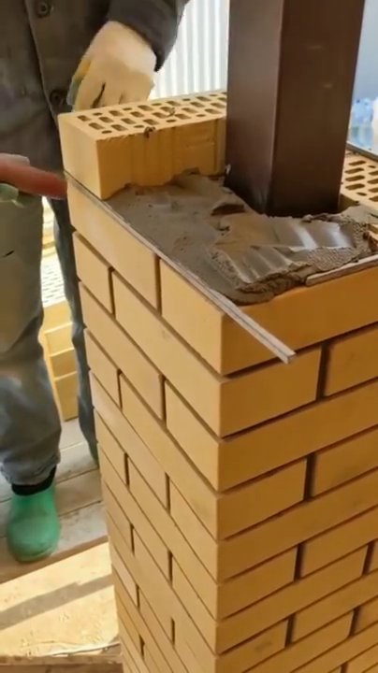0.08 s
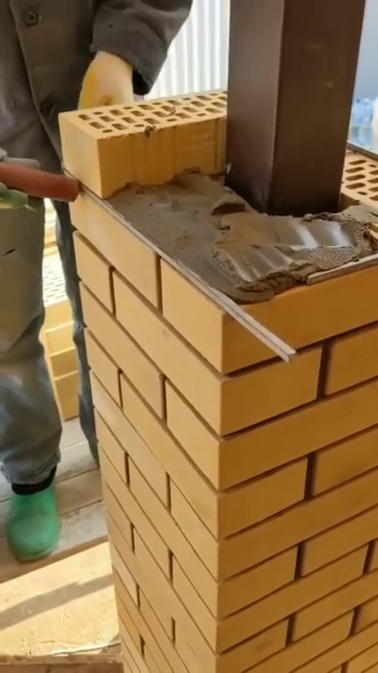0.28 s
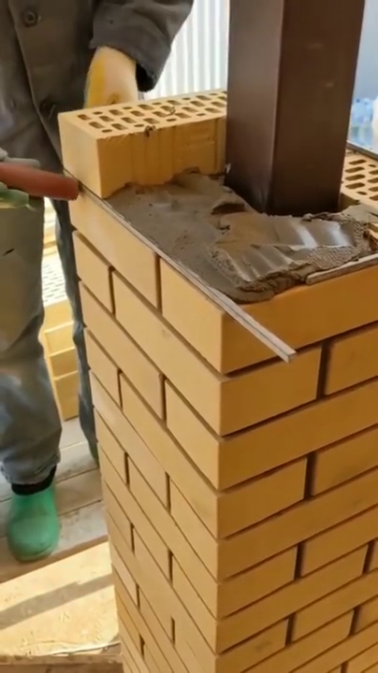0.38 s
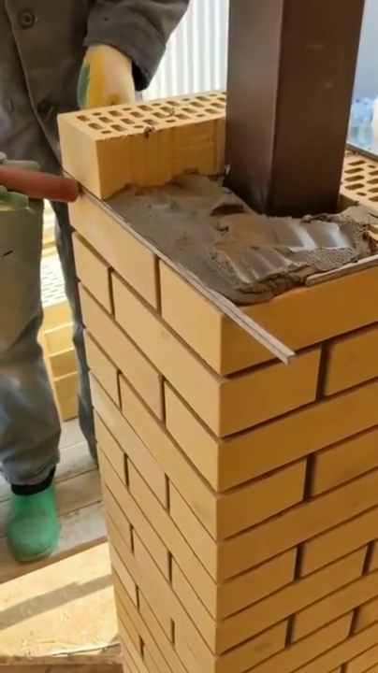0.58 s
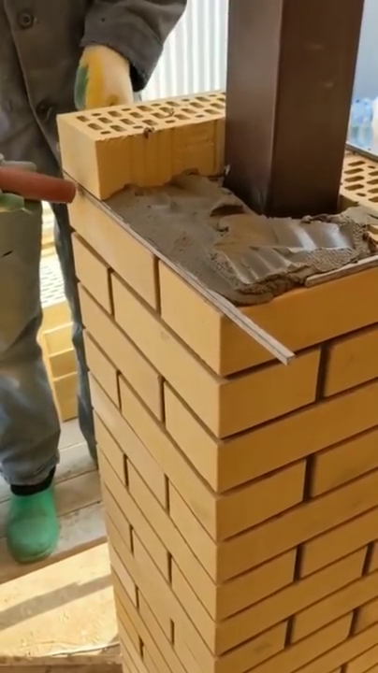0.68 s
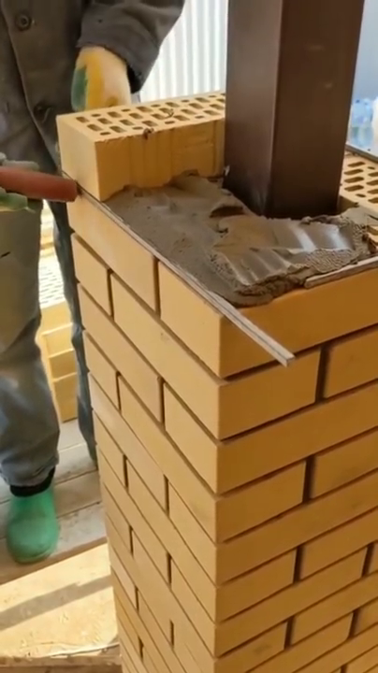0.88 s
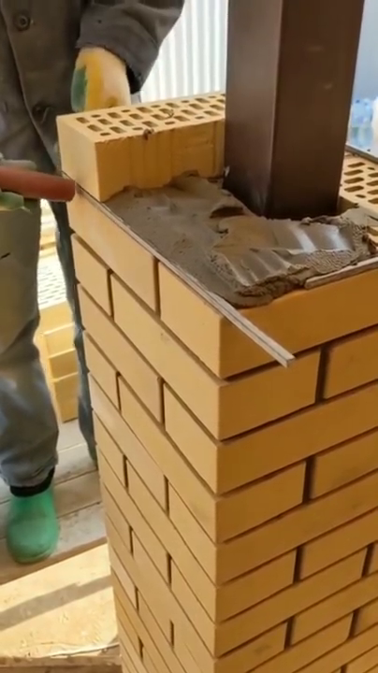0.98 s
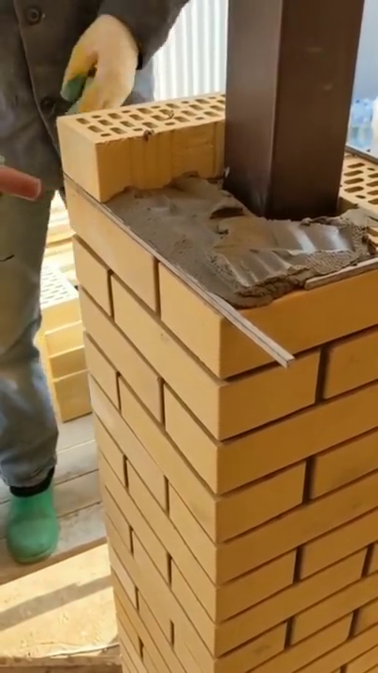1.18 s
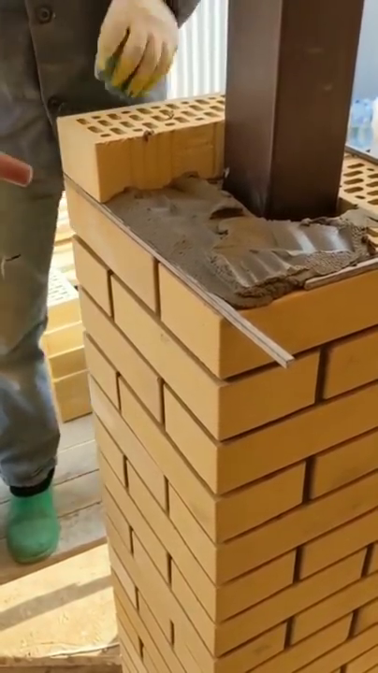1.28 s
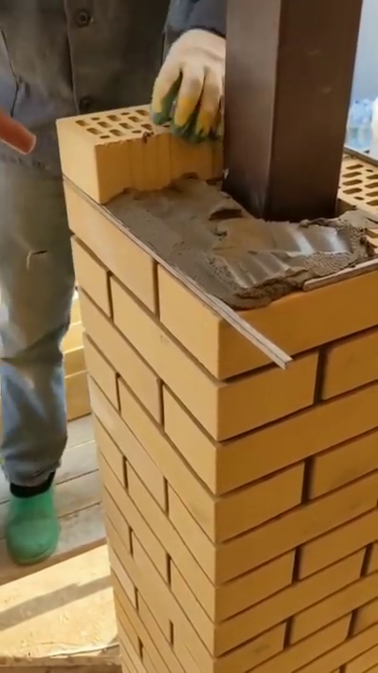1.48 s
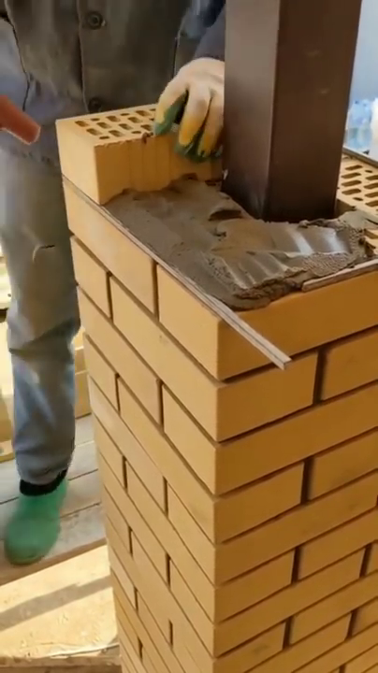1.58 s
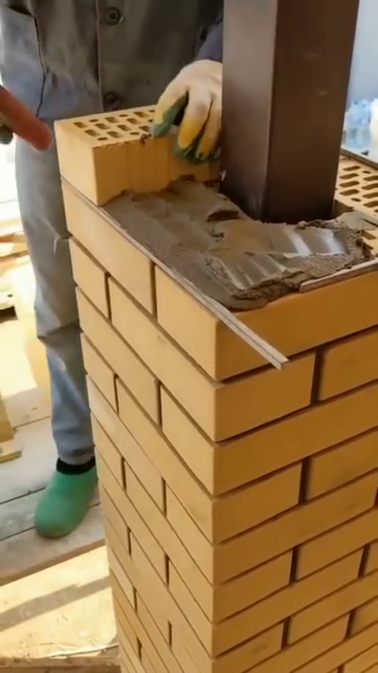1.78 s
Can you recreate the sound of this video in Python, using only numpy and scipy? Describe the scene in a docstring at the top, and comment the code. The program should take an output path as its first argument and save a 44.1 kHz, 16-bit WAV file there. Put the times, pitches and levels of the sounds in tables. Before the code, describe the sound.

A steel trowel taps a hollow clay brick five times, growing harder with a slight metallic ring, then touches lightly and scrapes gritty mortar; dull board knocks underfoot, close microphone, short room-like tail, quiet low rumble.

```python
"""Building site: a steel trowel taps a hollow clay brick down into its mortar bed.
Five blows, harder up to the fourth, then two light touches: coloured noise clacks plus dying modes of brick,
blade and clank, all with a room tail. Dull knocks from the boards underfoot: decaying sines with rattle noise.
The blade then scrapes mortar off the joint: random grain clicks through resonances, as rasp, drone and hiss.
Beneath lie a quiet noise rumble and faint rubs of glove and blade on the brick."""
import sys
import numpy as np
from scipy import signal
from scipy.fft import rfft, irfft
from scipy.io import wavfile

SR = 44100
rng = np.random.default_rng(int(sys.argv[2]) if len(sys.argv) > 2 else 0)


def digitize_waveform(pressure):
    """Quantize a signal to 16-bit integers and store it at the path in sys.argv[1].

    Rows of a 2-D input are taken as channels; values are limited to [-1, 1].
    """
    field = np.atleast_2d(pressure).T
    bounded = np.clip(field, -1, 1)
    quanta = np.round(bounded * 32767).astype(np.int16)
    wavfile.write(sys.argv[1], SR, quanta)


N = 81585
T = np.arange(N) / SR
FREQS = np.maximum(np.fft.rfftfreq(N, 1 / SR), 1)
RING_RISE_S, TAIL_RISE_S = 0.00083, 0.015


def from_db(db):
    """Decibels to amplitude gain."""
    return 10 ** (np.asarray(db) / 20)


def rms_one(x):
    """Scale to unit rms."""
    return x / np.sqrt(np.mean(x ** 2) + 1e-20)


def at_hz(points, hz):
    """Interpolate (f/Hz, value) rows on a log-frequency axis."""
    f, value = np.transpose(points)
    return np.interp(np.log(hz), np.log(f), value)


def levels(rows):
    """Gain curves from rows of (t/s, level/dB, ..), silent before the first row."""
    t_s, *columns_db = np.transpose(rows)
    started = T >= t_s[0]
    return [started * from_db(np.interp(T, t_s, db)) for db in columns_db]


def wander(per_s):
    """Random values at a given rate, joined by straight lines."""
    return np.interp(T * per_s, np.arange(2048), rng.standard_normal(2048))


def noise(spectrum, extra_db=0):
    """Noise of a given colour at about unit rms, then tinted by extra dB per frequency."""
    colour = rms_one(from_db(at_hz(spectrum, FREQS)))
    white = rfft(rng.standard_normal(N))
    return irfft(white * colour * from_db(extra_db), N)


def strike(start_s, rise_s, t60_s):
    """Impact envelope: linear rise times an exponential decay of 60 dB per t60."""
    age_s = np.maximum(T - start_s, 0)
    decay = np.exp(-np.log(1000) * age_s / t60_s)
    return np.minimum(age_s / rise_s, 1) * decay


def die_away(x, start_s, rise_s):
    """Absorption: overlapping octave bands of x each die at the room's rate."""
    # room decay: f/Hz, t60/s
    room_t60 = [(150, 0.4), (600, 0.31), (2000, 0.27), (5000, 0.19), (12000, 0.23)]
    centres_hz = 110 * 2. ** np.arange(8)
    spectrum = rfft(x)
    out = 0
    for hz, share in zip(centres_hz, np.eye(len(centres_hz))):
        weight = np.interp(np.log(FREQS), np.log(centres_hz), share)
        band = irfft(spectrum * weight, N)
        out = out + band * strike(start_s, rise_s, at_hz(room_t60, hz))
    return out


def room(x):
    """Diffuse reflections: convolution with a decaying noise response of unit energy."""
    response = die_away(rng.standard_normal(N), 0.0017, TAIL_RISE_S)
    return signal.fftconvolve(x, rms_one(response) / np.sqrt(N))[:N]


def ring(start_s, modes):
    """Struck modes: dying sines that waver as reflections overlap them."""
    waver_depth, waver_per_s = 0.27, 170
    out = 0
    for hz, db, t60_s in modes:
        waver = 1 + waver_depth * wander(waver_per_s)
        tone = np.sin(2 * np.pi * (hz * (T - start_s) + rng.random()))
        out = out + from_db(db) * strike(start_s, RING_RISE_S, t60_s) * waver * tone
    return out


def resonate(x, peaks):
    """Parallel two-pole resonances; rms 1."""
    out = 0
    for hz, width_hz, db in peaks:
        r = np.exp(-np.pi * width_hz / SR)  # pole radius
        zeros = [(1 - r * r) / 2, 0, (r * r - 1) / 2]
        poles = [1, -2 * r * np.cos(2 * np.pi * hz / SR), r * r]
        out = out + from_db(db) * signal.lfilter(zeros, poles, x)
    return rms_one(out)


def grit():
    """Sand grains snap under the juddering blade, and the room blurs them; rms 1."""
    grains_per_s, spread_db = 1400, 4.5
    judder_db, judder_per_s, room_db = 3.5, 110, 3.5
    sizes = from_db(spread_db * np.minimum(rng.exponential(1, N), 3))
    signed = sizes * rng.choice([-1, 1], N)
    snaps = rng.random(N) < grains_per_s / SR
    clicks = signed * snaps * from_db(judder_db * wander(judder_per_s))
    return rms_one(clicks + from_db(room_db) * room(clicks))


def background():
    """Site rumble as coloured noise; faint rubs as grit through ringing brick modes."""
    # site noise colour: f/Hz, density/dB per Hz (relative)
    site_colour = [(15, -36), (25, 0.5), (197, -3), (264, -2), (293, -10), (824, -14), (1160, -19),
                   (2570, -20), (3350, -26.5), (3730, -28), (14000, -41)]
    # rubs of glove and blade on the brick: t/s, level/dB
    stir_levels = [(0, -45), (.035, -55), (.075, -50.5), (.11, -82), (.22, -81), (1.25, -85), (1.287, -47),
                   (1.32, -55), (1.4, -69)]
    # rub resonances: f/Hz, width/Hz, level/dB (relative)
    stir_modes = [(225, 51, 3.5), (496, 59, 5.5), (1210, 29, 11), (1535, 22, 1), (2260, 67, -5)]
    site_db = -52
    stir, = levels(stir_levels)
    return from_db(site_db) * noise(site_colour) + stir * resonate(grit(), stir_modes)


def taps():
    """Each blow: dry noise clack, its room tail, brick and blade modes, and a clank set by the spot hit."""
    # blows: t/s, clack tint bass/dB, middle/dB, treble/dB, top/dB, brick ring/dB, blade ring/dB,
    # clank f/Hz, clank width/Hz, clank level/dB
    blows = [(0.2398, -26, -28.5, -42.5, -34.5, -32, -38, 3964, 160, -30),
             (0.4431, -25, -25, -34.5, -31, -27.5, -33, 1930, 159, -27.5),
             (0.6309, -20.5, -18, -20.5, -18, -33.5, -38, 1033, 40, -27.5),
             (0.8322, -20.5, -17, -20.5, -16, -21, -11, 5960, 90, -29),
             (1.01, -33.5, -32, -48, -62, -55, -61, 2700, 590, -63),
             (1.0309, -21, -22.5, -29.5, -28.5, -22, -53, 2263, 70, -23),
             (1.175, -30.5, -37, -54.5, -75, -45, -57, 1220, 80, -40),
             (1.324, -39, -48, -55, -42, -58, -67.5, 1960, 200, -40)]
    # anchors of the four clack tints: f/Hz
    tint_hz = [500, 1900, 4800, 10000]
    # clack colour before tint: f/Hz, density/dB per Hz (relative)
    clack_colour = [(60, -11), (180, -11), (330, -3.5), (450, -7.5), (500, -9), (590, -1.5), (780, -6.5),
                    (1080, -3.5), (1250, -4.5), (1500, -7), (2200, -4.5), (2900, -10), (4500, -8),
                    (6200, -10), (8000, -15), (10000, -23), (14000, -28)]
    # brick modes: f/Hz, level/dB (relative), t60/s
    brick_modes = [(435, -14, .24), (600, -7, .2), (676, -11, .24), (857, -14, .27), (1371, -17, .2),
                   (1490, -4, .17), (1530, -11, .13), (1869, -7, .17), (2238, -6, .18), (2471, -16, .22)]
    # blade modes: f/Hz, level/dB (relative), t60/s
    blade_modes = [(3988, 1, .035), (3975, -17, .13), (4055, -17, .08), (5317, -13, .13), (5878, -9, .19),
                   (6650, -21, .19)]
    crack_db, crack_rise_s, crack_t60_s, crack_bass_hz = 9.5, 0.0048, 0.056, 443
    tail_db, clank_t60_s, ring_room_db = 1, 0.11, -10.5
    thin = signal.butter(2, crack_bass_hz, "high", fs=SR, output="sos")
    clacks, rings = 0, 0
    for start_s, *tint_db, brick_db, blade_db, clank_hz, clank_width_hz, clank_db in blows:
        tint = at_hz(list(zip(tint_hz, tint_db)), FREQS)
        crack = signal.sosfilt(thin, noise(clack_colour, tint))
        crack = crack * strike(start_s, crack_rise_s, crack_t60_s)
        tail = die_away(noise(clack_colour, tint), start_s, TAIL_RISE_S)
        clacks = clacks + from_db(crack_db) * crack + from_db(tail_db) * tail

        clank = resonate(rng.standard_normal(N), [(clank_hz, clank_width_hz, 0)])
        clank = clank * strike(start_s, RING_RISE_S, clank_t60_s)
        rings = rings + from_db(brick_db) * ring(start_s, brick_modes)
        rings = rings + from_db(blade_db) * ring(start_s, blade_modes)
        rings = rings + from_db(clank_db) * clank
    return clacks + rings + from_db(ring_room_db) * room(rings)


def knocks():
    """Boards underfoot: soft decaying sines, each with a muffled rattle and a brief bump of contact."""
    # knocks: t/s, f/Hz, level/dB, t60/s, rise/s, rattle/dB, rattle top/Hz
    board_knocks = [(0.3647, 198, -30, 0.1, 0.0018, -35.5, 580), (0.761, 141, -22, .085, 0.0061, -30, 1260),
                    (1.085, 66, -42.5, .25, 0.0074, -45.5, 304), (1.325, 387, -36, 0.11, 0.0027, -52, 400),
                    (1.766, 63, -28, .11, 0.0053, -76, 253)]
    rattle_t60_s, bump_db, bump_t60_s = 0.25, 9.5, 0.017
    out = 0
    for start_s, hz, db, t60_s, rise_s, rattle_db, top_hz in board_knocks:
        thud = strike(start_s, rise_s, t60_s) * np.sin(2 * np.pi * hz * (T - start_s))
        # f/Hz, density/dB per Hz (relative)
        rattle = noise([(40, -14), (170, 0), (top_hz, -4), (2 * top_hz, -20), (15000, -58)])
        bump = from_db(bump_db) * strike(start_s, rise_s, bump_t60_s)
        contact = strike(start_s, rise_s, rattle_t60_s) + bump
        out = out + from_db(db) * thud + from_db(rattle_db) * rattle * contact
    return out


def scrape():
    """Grit drives the blade's rasp, the brick hollows' drone and a sandy hiss; a new stroke begins late."""
    # scrape, before trim and catches: t/s, rasp/dB, drone/dB, hiss/dB
    stroke_levels = [(1.359, -48, -66, -41.5), (1.367, -42, -68, -47), (1.39, -29.5, -35, -39.5),
                     (1.415, -30.5, -38, -38.5), (1.46, -31, -35.5, -40), (1.505, -40.5, -27, -35),
                     (1.524, -49, -29.5, -36.5), (1.545, -57, -29, -35), (1.595, -43.5, -38.5, -40),
                     (1.64, -54, -47.5, -61), (1.70, -94, -64, -90.5), (1.785, -64.5, -86, -65),
                     (1.82, -47.5, -68, -49.5), (1.85, -54, -46, -50.5)]
    # rasp resonances: f/Hz, width/Hz, level/dB (relative)
    rasp_modes = [(155, 55, -19), (247, 50, -10), (360, 96, 0), (607, 340, -7.5), (990, 230, -11.5),
                  (1600, 140, 3), (1840, 117, 7), (2020, 130, -2), (2226, 230, 1), (2645, 90, 7),
                  (2830, 130, -10.5), (4100, 160, -32)]
    # brick hollows: f/Hz, width/Hz, level/dB (relative)
    drone_modes = [(142, 120, -17.5), (443, 18.5, -4), (480, 25, 2), (635, 29, -1), (843, 103, -7),
                   (981, 33, -5), (1048, 41, -0.5), (1757, 79, -5.5), (2720, 110, -25)]
    # hiss colour: f/Hz, density/dB per Hz (relative)
    hiss_colour = [(800, -1), (2500, -3.5), (4000, 0.5), (6000, -5), (9000, -10), (14000, -13.5)]
    # blade catches on coarse grains: t/s, boost of rasp and drone/dB (decays)
    catches = [(1.366, 8), (1.388, 2), (1.412, 4), (1.5225, 5)]
    rasp_top_hz, rasp_trim_db, catch_t60_s = 3340, -0.5, .06
    rasp, drone, hiss = levels(stroke_levels)
    sand = rms_one(irfft(rfft(grit()) * from_db(at_hz(hiss_colour, FREQS)), N))
    dull = signal.butter(4, rasp_top_hz, fs=SR, output="sos")
    grinding = signal.sosfilt(dull, resonate(grit(), rasp_modes))
    humming = resonate(grit(), drone_modes)
    boost_db = sum(db * strike(start_s, RING_RISE_S, catch_t60_s) for start_s, db in catches)
    dragged = from_db(rasp_trim_db) * rasp * grinding + drone * humming
    return from_db(boost_db) * dragged + hiss * sand


def scene():
    """All sources at one microphone, with narrow dips in their common colour."""
    # dips: f/Hz, sharpness Q, gain at centre/dB
    dips = [(491, 42, -6), (1248, 7.7, -12)]
    sound = background() + taps() + knocks() + scrape()
    for hz, q, depth_db in dips:
        notched = signal.lfilter(*signal.iirnotch(hz, q, fs=SR), sound)
        sound = notched + from_db(depth_db) * (sound - notched)
    return sound[None]


def record(dry):
    """The microphone loses the deepest bass; the top is cut steeply."""
    low_cut_hz, top_cut_hz = 49, 13850
    bass_cut = signal.butter(2, low_cut_hz, "high", fs=SR, output="sos")
    top_cut = signal.ellip(10, .3, 70, top_cut_hz, fs=SR, output="sos")  # ripple/dB, stopband/dB
    return signal.sosfilt(top_cut, signal.sosfilt(bass_cut, dry))


dry = scene()
out = record(dry)
digitize_waveform(out)
```